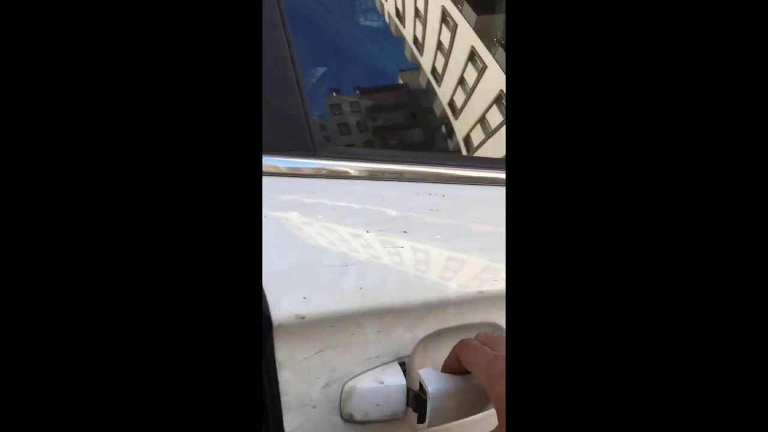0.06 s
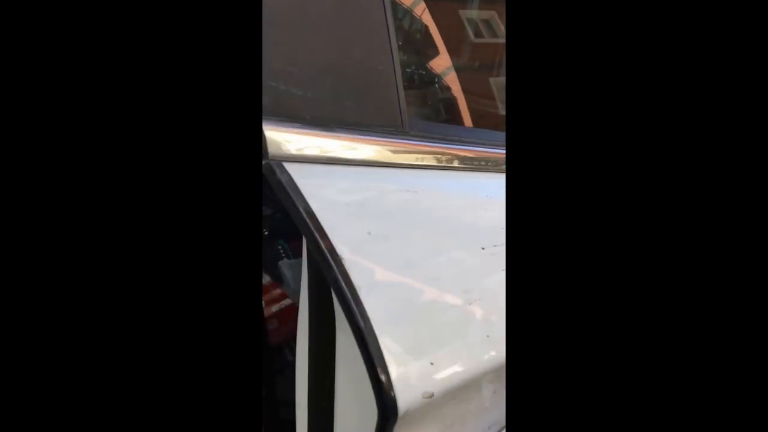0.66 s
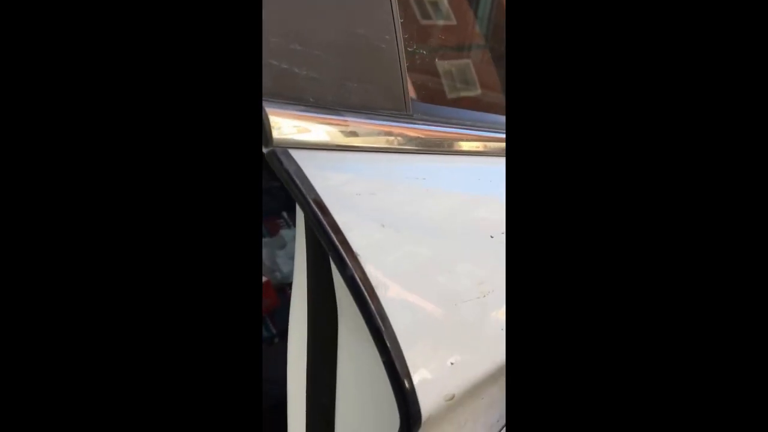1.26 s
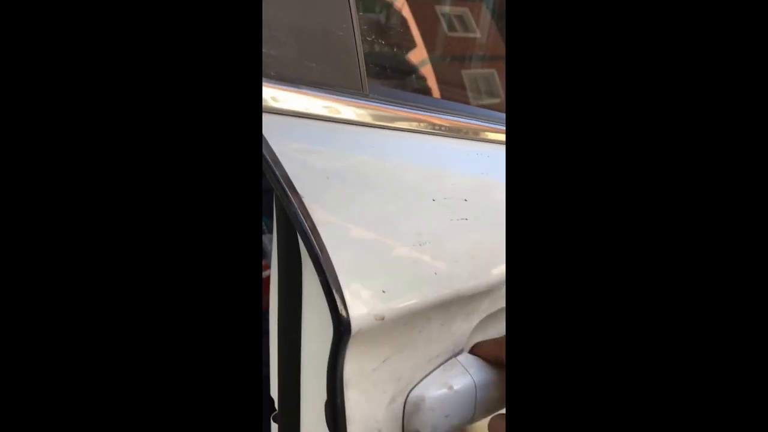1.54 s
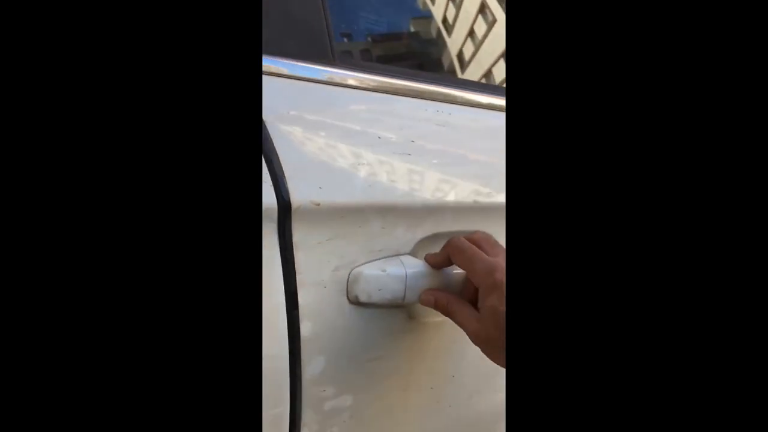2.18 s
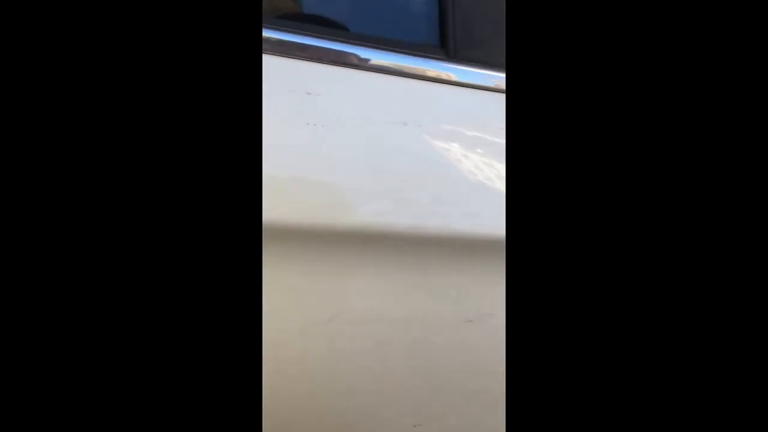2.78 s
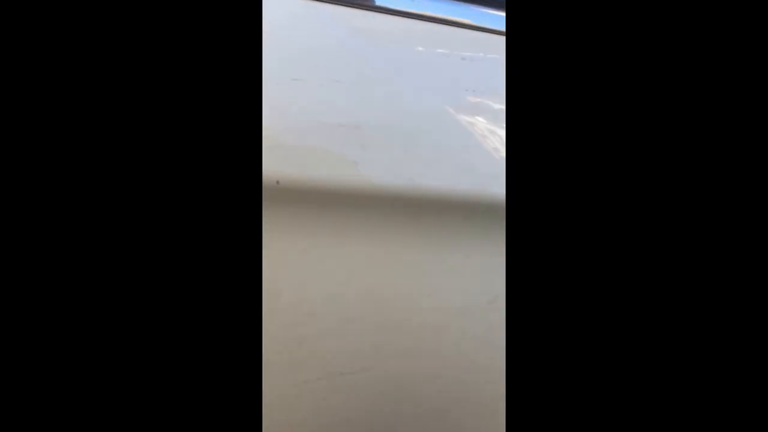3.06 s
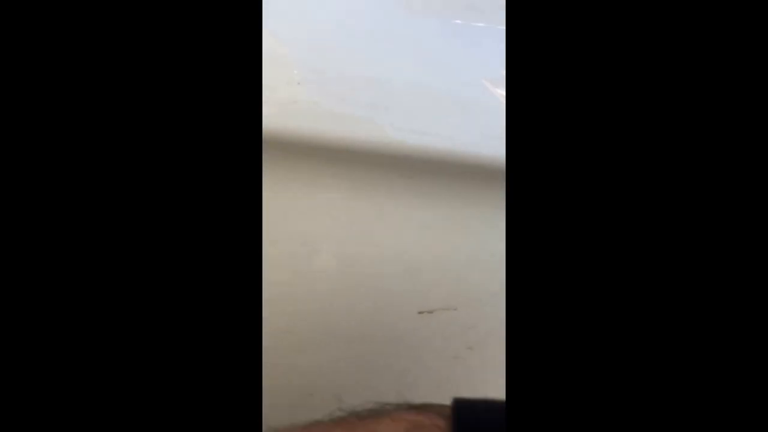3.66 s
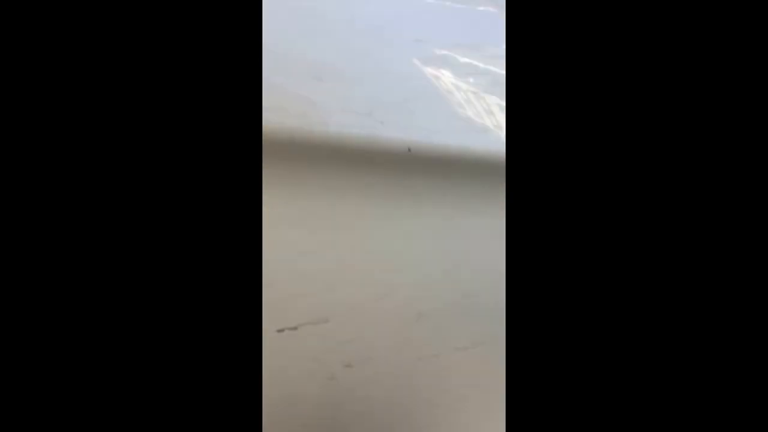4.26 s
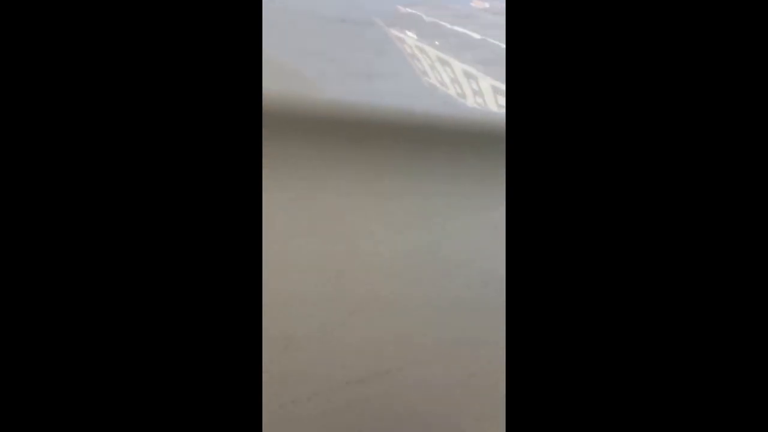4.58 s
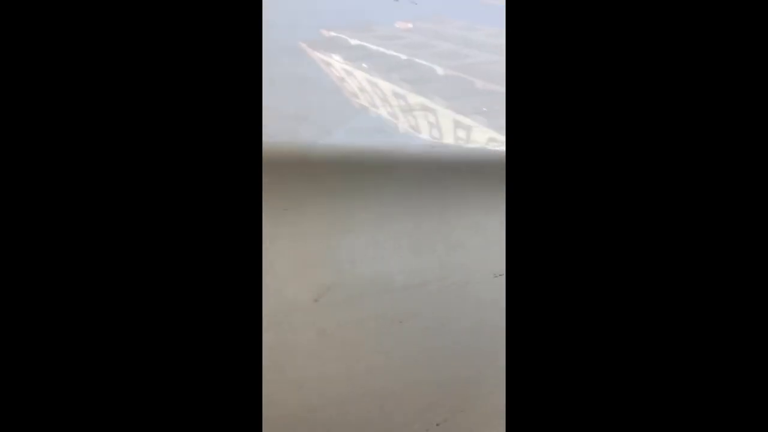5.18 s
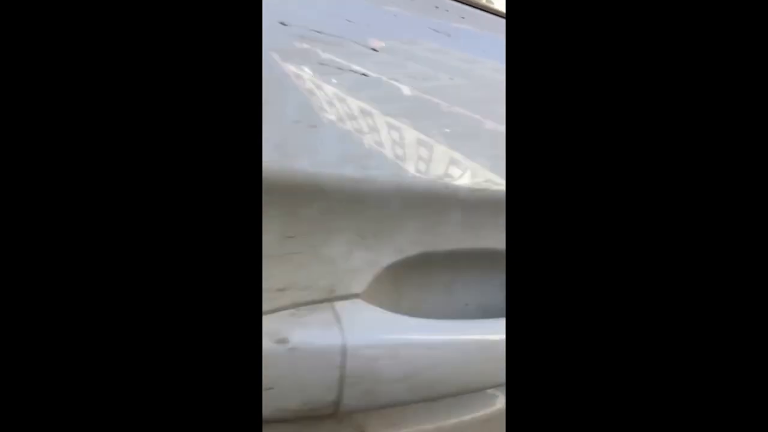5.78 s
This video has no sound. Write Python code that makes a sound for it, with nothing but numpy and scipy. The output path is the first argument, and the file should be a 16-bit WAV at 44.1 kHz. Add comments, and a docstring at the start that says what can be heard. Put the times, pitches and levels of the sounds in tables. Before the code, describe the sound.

On a city street with a faint rumble of traffic, a car door pops open close to the microphone. The plastic handle is pulled and released, clacking three times. The door then shuts with a metallic click and a short, low boom. Nine evenly spaced knuckle knocks follow on the door's metal skin, hollow and resonant, with a trace of echo from the buildings.

```python
"""A car door in a city street

Close by, the handle is pulled and the door pops open. A spring snaps the handle back three times.
The door is pushed shut: the latch clacks and the cabin booms. Then knuckles knock nine times on the
hollow sheet-metal panel, which rings with many tones at once. Behind it all, distant traffic rumbles,
a sleeve brushes past and the house fronts throw back a faint echo."""
import sys
import numpy as np
from scipy import signal
from scipy.fft import rfft, irfft, next_fast_len
from scipy.io import wavfile
from scipy.ndimage import uniform_filter1d, minimum_filter1d

SR = 44100
rng = np.random.default_rng(int(sys.argv[2]) if len(sys.argv) > 2 else 0)


def waveform_to_disk(signal):
    """Save audio, clipped to [-1, 1], as 16-bit WAV at the path in sys.argv[1]."""
    frames = np.transpose(np.atleast_2d(signal))
    scaled = np.clip(frames, -1, 1) * 32767
    samples = np.round(scaled).astype(np.int16)
    wavfile.write(sys.argv[1], SR, samples)


N = 266364
AGE = np.arange(SR * 3 // 4) / SR  # seconds since a short sound began

# Levels are relative. A ring time (t60) is the time to fade by 60 dB. More hardness means more treble.
# tone colour of distant traffic: (pitch [Hz], level [dB])
TRAFFIC_COLOUR = [(15, -35), (25, -18.5), (59, -2), (137, -7), (217, -16), (256, -14), (363, -15),
                  (405, -24), (439, -22.5), (476, -27), (624, -29), (734, -29.5), (1290, -33),
                  (5000, -54.5), (16000, -59)]
# traffic roar, turned down once the knocking starts, as by noise suppression: (time [s], level [dB])
ROAR_LEVELS = [(0, -49.5), (1.1, -48), (1.6, -50), (2.7, -51), (3.0, -47), (3.15, -53.5), (6.04, -51)]
# faint background hiss, turned down at times, as by noise suppression: (time [s], level [dB])
HISS_LEVELS = [(0, -63), (0.3, -76), (0.42, -62), (1.65, -66.5), (2.15, -79.5), (2.36, -67.5), (2.8, -68.5),
               (3.22, -82), (3.55, -68.5), (5.75, -68.5), (6.04, -71.5)]
# its colour: (pitch [Hz], level [dB])
HISS_COLOUR = [(2000, -15), (3500, -3), (6500, -2.5), (8000, -5), (9500, -5), (12000, -7), (16000, -10.5)]
# brushing cloth: (pitch [Hz], level [dB])
SLEEVE_COLOUR = [(1500, 2), (3400, -10), (4400, 0.5), (5200, -14), (7000, -15.5), (11000, -24),
                 (16000, -31)]
# how the echo fades: (pitch [Hz], ring time [s])
ECHO_DECAY = [(150, 0.99), (1000, 0.41), (4000, 0.12), (12000, 0.071)]

# the latch leaves or meets its catch: (time [s], level [dB], hardness [dB/octave])
LATCH_HITS = [(.1540, -15, -2), (2.2717, -10.5, -5), (2.2871, 0, 2.5), (2.292, -9.5, -7.5),
              (2.2974, -10, -6.5), (2.31, -25.5, 6), (2.325, -22, 0.5)]
# colour of those hits: (pitch [Hz], level [dB])
LATCH_COLOUR = [(50, -30.5), (150, -3.5), (400, -2), (600, 3.5), (900, 0.5), (1200, -3), (1600, -5.5),
                (2600, 0), (3500, -10.5), (5000, -18.5), (7000, -15.5), (10000, -27.5), (16000, -42.5)]
# tones of the steel latch: (pitch [Hz], level [dB], ring time [s])
LATCH_TONES = [(1167, 3.5, 0.11), (2200, -21, .07), (2540, 2, 0.065), (2690, -10, 0.036), (3040, 5, 0.048),
               (3310, -1, 0.056), (4200, -18, 0.092), (6570, -11, .05)]
# the whole door moves on its seal: (time [s], level [dB], hardness [dB/octave])
DOOR_THUMPS = [(0.1527, -6.5, 1.5), (0.171, -17, -3.5), (.719, -25, 0.5), (2.2959, 3.5, -4.5)]
# tones of door and cabin: (pitch [Hz], level [dB], ring time [s])
CABIN_TONES = [(45, -17.5, 0.36), (68.1, -2.5, 0.34), (97.56, -9.5, 0.48), (111, -11.5, 0.51),
               (147.7, -11, 0.29), (213.2, -13.5, .25), (247, -13, 0.34), (311, 0, 0.09), (374, -14, 0.14),
               (457, -9, 0.16)]

# the handle hits its stop:
# (time [s], level [dB], hardness [dB/octave], housing level [dB], flight time [s])
HANDLE_SNAPS = [(0.3777, 1, 3.5, -4, 0.028), (0.792, 1, 3.5, -2, .0305), (1.212, 2.5, 3, -2, .0333)]
# flying back, it slips off the fingers, then grazes its guide:
# (share of the flight left [0..1], level [dB], hardness [dB/octave])
FLIGHT_TICKS = [(0.98, -17.5, 0.5), (.31, -18.5, -2)]
# it bounces on the stop: (delay [s], level [dB], hardness [dB/octave])
HANDLE_BOUNCES = [(0, -3.5, 2), (.0044, -4.5, -5.5), (.012, -11, 0)]
# tones of the handle's housing: (pitch [Hz], level [dB])
HOUSING_TONES = [(102, -5), (165, -9), (221, 3), (262, 2.5), (292, 0), (350, -2.5), (420, -4.5), (480, -12),
                 (624, 4.5), (689, -4), (850, -6), (965, 0), (1380, -4.5), (1570, -3.5), (1965, -6.5)]
# clack of hard plastic: (pitch [Hz], level [dB])
SNAP_COLOUR = [(40, -43), (120, -21), (300, 5), (700, 13), (1300, 0.5), (2000, 3.5), (2600, -10), (3900, 0),
               (5200, -9.5), (6800, -7.5), (7900, -19.5), (9800, -16.5), (13000, -28.5), (16000, -30.5)]
# how plastic and latch metal fade: (pitch [Hz], ring time [s])
CLACK_DECAY = [(300, 0.082), (1500, 0.098), (5000, 0.059), (12000, 0.035)]
# tones of the handle's spring: (pitch [Hz], level [dB], ring time [s])
SPRING_TONES = [(2940, -7.5, .4), (3160, -3.5, 0.86), (3510, 1, 1), (3865, 0.5, .5)]
# clicks of the rods and plastic inside the handle: (time [s], level [dB], hardness [dB/octave])
ROD_TICKS = [(0.0878, -26.5, -2), (0.2448, -24.5, -6), (0.6247, -18, -3), (0.6887, -19.5, -1),
             (0.7192, -21.5, 2.5), (1.0514, -24.5, 0), (1.0959, -18, -1), (1.118, -25.5, 3.5),
             (1.4094, -31.5, 4), (1.6257, -27.5, 3)]
# their colour: (pitch [Hz], level [dB])
ROD_COLOUR = [(60, -49), (300, -15), (500, 4), (900, 3), (1800, 1), (2700, -6.5), (3900, -3.5), (6000, -16),
              (8000, -16), (9800, -17.5), (16000, -25)]
# the handle slides in its guide: (start [s], end [s], level [dB])
HANDLE_SLIDES = [(0.11, 0.238, -45.5), (0.608, 0.804, -48), (1.027, 1.222, -48.5), (1.728, 1.811, -54.5)]

# knuckle blows: (time [s], level [dB], hardness [dB/octave],
# spot [0 = stiff rim, 1 = middle of the panel], bone tap [dB], treble bite [dB])
KNUCKLE_BLOWS = [(3.0594, 0.5, -0.56, 0.3, -4, -1), (3.3411, 3, -0.76, .56, -1.5, 2),
                 (3.6103, 1.4, -1, 0.47, 2, 3), (3.8863, 1, -0.45, 0.78, 6, 1),
                 (4.18, 2, -0.7, 0.64, -4.5, -2.5), (4.4999, 0.1, -1.25, 0.68, 2, -1),
                 (4.8079, 1.55, -0.5, 0.26, 3, -0.5), (5.0936, -1.1, -0.6, 0.01, 2, -12.5),
                 (5.382, 0.5, -0.5, 0.013, 2, -2)]
# tones of the panel: (pitch [Hz], level hit at the rim [dB], in the middle [dB], uncapped ring time [s])
PANEL_TONES = [(107.7, -16.5, -16, 0.53), (133.05, -9, -7.5, 0.25), (147.2, -20.5, -17, 0.65),
               (170, -23.5, -8, 0.49), (185.1, -17.5, -13.5, 0.46), (207.3, -3, -10, 0.17),
               (232.9, -14.5, -24.5, 0.42), (271.4, -20, -14, 0.33), (294.9, -15.5, -14.5, 0.23),
               (328.7, -13, -20.5, 0.35), (351.6, -1.5, -16, 0.079), (371.7, -11, -12, 0.12),
               (401.3, -20, -5, 0.12), (456.7, -19, -10, 0.15), (502, -25.5, -35.5, 0.45),
               (535, -20.5, -19.5, 0.2), (573.6, -24, -32.5, 0.66), (598.6, -13.5, -22.5, 0.14),
               (639.5, -12, -14.5, 0.11), (679.6, -26.5, -14.5, 0.13), (726, -8.5, -15.5, 0.026),
               (790, -49.5, -29, 0.13), (754, -28, -34.5, 0.1), (815, -31.5, -24, 0.1),
               (922, -35, -36, 0.37), (938, -34, -22, 0.21), (979, -27, -22.5, 0.19), (957, -51, -27, 0.45),
               (1072, -16.5, -18, 0.078), (1148, -52, -43, 0.81)]
# its crowded upper tones, which blur into noise: (pitch [Hz], level [dB])
SHEET_COLOUR = [(60, -45.5), (200, -26), (450, -2), (700, 8), (1100, 1), (1600, -3), (2400, -6),
                (3200, -20.5), (4300, -33), (6000, -39), (9000, -37.5), (16000, -40.5)]
# how they fade: (pitch [Hz], ring time [s])
SHEET_DECAY = [(300, 0.27), (1100, 0.23), (1400, 0.15), (2500, 0.1), (4000, 0.12), (10000, 0.027)]
# the bone's first tap on the paint: (pitch [Hz], level [dB])
TAP_COLOUR = [(40, -53.5), (250, 6), (800, 5.5), (1700, 8.5), (2600, -8.5), (3500, -30.5), (5000, -52.5),
              (9000, -37.5), (16000, -50)]


def gain_of(db):
    """Turns decibels into a number to multiply by."""
    return 10 ** (np.asarray(db) / 20)


def evened(x):
    """Scales a signal to an average strength (rms) of 1."""
    return x / np.sqrt(np.mean(x ** 2) + 1e-20)


def fade(t60, t=AGE):
    """A fade that drops 60 dB every t60 seconds."""
    return np.exp(-np.log(1000) * t / t60)


def read(points, hz):
    """Looks up a table between its rows, on a musical (log) pitch scale."""
    pitches, values = np.transpose(points)
    return np.interp(np.log(hz + 1), np.log(pitches + 1), values)


def add(mix, s, sound):
    """Lays a sound into the mix at s seconds."""
    part = mix[round(s * SR):][:len(sound)]
    part += sound[:len(part)]


def noise(colour, size):
    """Noise of strength 1 with the given tone colour."""
    gains = gain_of(read(colour, np.fft.rfftfreq(size, 1 / SR)))
    return evened(irfft(rfft(rng.standard_normal(size)) * gains, size))


def filtered(x, curve_db):
    """Colours a short sound by a function from Hz to dB."""
    size = next_fast_len(2 * len(x))
    gains = gain_of(curve_db(np.fft.rfftfreq(size, 1 / SR)))
    return irfft(rfft(x, size) * gains, size)[:len(x)]


def tilted(x, hardness, pivot_hz):
    """A harder, shorter touch lifts the treble against the bass."""
    return filtered(x, lambda hz: hardness * np.log2(np.clip(hz / pivot_hz, 1 / 8, 8)))


def dying(x, decay):
    """Lets each pitch band of a steady sound fade at its own speed."""
    hz, spectrum = np.fft.rfftfreq(len(x), 1 / SR), rfft(x)
    centres, t60s = np.transpose(decay)
    bands = [irfft(spectrum * read(np.c_[centres, share], hz), len(x)) for share in np.eye(len(decay))]
    return sum(band * fade(t60) for band, t60 in zip(bands, t60s))


def ring(tones, travel, rise):
    """A struck part's fading tones; low ones travel slower (travel = delay in seconds at 1 kHz)."""
    hz, db, t60 = np.transpose(tones)[:, :, None]
    t = np.maximum(AGE - travel / np.sqrt(hz / 1000), 0)
    onset = 1 - np.exp(-(t / rise) ** 2)
    return (gain_of(db) * onset * fade(t60, t) * np.sin(2 * np.pi * hz * t)).sum(0)


def clack(colour, hardness, crack_db, crack_t60, tail_db):
    """Two hard parts meet: a sharp crack, then a short clatter."""
    grain = tilted(noise(colour, len(AGE)), hardness, pivot_hz=1930)
    contact_s = .0002 * 2 ** (-hardness / 2)  # a softer touch builds up more slowly
    onset = 1 - np.exp(-(AGE / contact_s) ** 2)
    crack = gain_of(crack_db) * grain * fade(crack_t60)
    return onset * (crack + gain_of(tail_db) * dying(grain, CLACK_DECAY))


def street():
    """Distant traffic and a faint background hiss; roar and hiss are turned down at set times."""
    t = np.arange(N) / SR
    traffic = signal.sosfilt(signal.butter(2, 4000, fs=SR, output="sos"), noise(TRAFFIC_COLOUR, N))
    rumble = signal.sosfiltfilt(signal.butter(2, 500, fs=SR, output="sos"), traffic)
    roar = gain_of(np.interp(t, *np.transpose(ROAR_LEVELS))) * evened(traffic - rumble)
    hiss = gain_of(np.interp(t, *np.transpose(HISS_LEVELS))) * noise(HISS_COLOUR, N)
    return gain_of(-40) * evened(rumble) + roar + hiss


def sleeve(start_s=2.79, rise_s=0.0068, fade_db_per_s=350, trail_s=.29):
    """Cloth brushes briefly and trails off in a soft hiss."""
    out = np.zeros(N)
    brush = np.minimum(AGE / rise_s, 1) * gain_of(-41 - fade_db_per_s * AGE)
    trail = gain_of(-61.5) * np.sin(np.pi * np.minimum(AGE / trail_s, 1))
    add(out, start_s, (brush + trail) * noise(SLEEVE_COLOUR, len(AGE)))
    return out


def echo(x):
    """Sound scatters back from the house fronts."""
    tail = dying(rng.standard_normal(len(AGE)), ECHO_DECAY) * (1 - np.exp(-AGE / 0.049))
    return signal.fftconvolve(x, tail / np.linalg.norm(tail))[:N]


def door(swell_cycles=0.27):
    """The door pops off its seal; later the latch catches and the cabin booms."""
    out = np.zeros(N)
    for s, db, hardness in LATCH_HITS:
        hit = clack(LATCH_COLOUR, hardness, crack_db=-31.5, crack_t60=0.043, tail_db=-12.5)
        add(out, s, gain_of(db) * hit)
    shut_s = LATCH_HITS[2][0]
    add(out, shut_s, gain_of(-20.5) * ring(LATCH_TONES, travel=0.00025, rise=0.00033))
    hz, tone_db, t60 = np.transpose(CABIN_TONES)
    for s, db, hardness in DOOR_THUMPS:
        tones = np.c_[hz, tone_db + hardness * np.log2(hz / 130), t60]
        boom = ring(tones, travel=0.0009, rise=swell_cycles / hz[:, None])
        add(out, s, gain_of(db - 8) * boom)
    return out


def tick(db, hardness):
    """One light click of the rods and plastic inside the handle."""
    return gain_of(db) * clack(ROD_COLOUR, hardness, crack_db=-6.5, crack_t60=.016, tail_db=-27)


def spring(flutter_db=4, flutter_s=.012):
    """The handle's spring sits loosely, so its ring flutters."""
    shake = evened(uniform_filter1d(rng.standard_normal(len(AGE)), size=round(flutter_s * SR)))
    return gain_of(-54 + flutter_db * shake) * ring(SPRING_TONES, travel=0, rise=0.00082)


def slides(ticks_per_s=28, tick_lift_db=18.5, spread_db=2.5):
    """The handle rubs unevenly along its guide, with faint random ticks."""
    out = np.zeros(N)
    for start, end, db in HANDLE_SLIDES:
        size = round((end - start) * SR)
        grip = gain_of(2 * evened(uniform_filter1d(rng.standard_normal(size), size=200)))
        rub = tilted(noise(ROD_COLOUR, size), hardness=0.46, pivot_hz=2000)
        add(out, start, gain_of(db) * evened(rub * grip) * signal.windows.tukey(size, .4))
        for place, strength in rng.random((round(ticks_per_s * (end - start)), 2)):
            tick_db = db + tick_lift_db + spread_db * (2 * strength - 1)
            add(out, start + place * (end - start), tick(tick_db, hardness=0.8))
    return out


def handle(lowest_hz=85):
    """The handle slides out, its rods tick, and the spring throws it back against the housing."""
    out = np.zeros(N)
    hz, tone_db = np.transpose(HOUSING_TONES)
    t60 = 0.16 / np.sqrt(hz / 100)
    housing = ring(np.c_[hz, tone_db, t60], travel=.0012, rise=0.0011)
    for s, db, hardness, housing_db, flight_s in HANDLE_SNAPS:
        for to_go, tick_db, tick_hardness in FLIGHT_TICKS:
            add(out, s - to_go * flight_s, tick(db + tick_db, tick_hardness))
        add(out, s, gain_of(housing_db - 8) * housing)
        for delay, bounce_db, harder in HANDLE_BOUNCES:
            hit = clack(SNAP_COLOUR, hardness + harder, crack_db=-1.5, crack_t60=0.0055, tail_db=-14.5)
            add(out, s + delay, gain_of(db + bounce_db) * hit)
    add(out, HANDLE_SNAPS[0][0], spring())  # rings on the first snap only
    for s, db, hardness in ROD_TICKS:
        add(out, s, tick(db, hardness))
    out += slides()
    # so small a part gives off no deep bass
    return signal.sosfilt(signal.butter(3, lowest_hz, "highpass", fs=SR, output="sos"), out)


def bone_tap(size=2048):
    """Bone meets paint: the shortest pulse that has the tap's colour, with a peak of 1."""
    log_gain = np.log(gain_of(read(TAP_COLOUR, abs(np.fft.fftfreq(size, 1 / SR)))))
    spectrum = np.exp(np.conj(signal.hilbert(log_gain)))  # packs the energy at the very start
    pulse = np.fft.ifft(spectrum).real[:size // 2]
    return np.pad(pulse / abs(pulse).max(), (0, len(AGE) - len(pulse)))


def knuckle_bite(x, bite_db, centre_hz=3300, octaves=.55):
    """A bony knuckle brings out one treble band; a fleshy one mutes it."""
    return filtered(x, lambda hz: bite_db * np.exp(-(np.log2((hz + 1) / centre_hz) / octaves) ** 2))


def knocks(longest_ring_s=0.36, swell_cycles=0.8, detune=0.01):
    """Each blow rings the same panel; the spot struck sets how strong each tone is."""
    out = np.zeros(N)
    hz, rim_db, middle_db, t60 = np.transpose(PANEL_TONES)
    t60 = np.minimum(t60, longest_ring_s)
    places = np.linspace(0, 1, num=4)  # the crowded tones answer differently along the panel
    patterns = np.array([noise(SHEET_COLOUR, len(AGE)) for _ in places])
    for s, db, hardness, spot, tap_db, bite_db in KNUCKLE_BLOWS:
        # short waves have their still points close together, so they vary most from blow to blow
        scatter_db = 4 * np.minimum(hz / 800, 1) * rng.uniform(-1.5, 1.2, len(hz))
        tone_db = rim_db + spot * (middle_db - rim_db) + hardness * np.log2(hz / 400) + scatter_db
        # the hand presses on the panel a little differently each time
        shifted_hz = hz * (1 + detune * rng.standard_normal(len(hz)))
        body = ring(np.c_[shifted_hz, tone_db, t60], travel=.0012, rise=swell_cycles / hz[:, None])
        nearness = np.exp(-((spot - places) / 0.25) ** 2)
        sheet = dying(evened(nearness @ patterns), SHEET_DECAY) * (1 - np.exp(-AGE / 0.0014))
        upper = gain_of(-17.5) * sheet + gain_of(tap_db - 10) * bone_tap()
        upper = tilted(upper, hardness + 0.48 * (spot - .5), pivot_hz=500)
        add(out, s, gain_of(db) * (body + knuckle_bite(upper, bite_db)))
    return out


def scene():
    """The door close by, its echo, the street and the sleeve, in one channel."""
    near = knocks() + handle() + door()
    return (near + gain_of(-38) * echo(near) + street() + sleeve())[None]


def record(dry, lowest_hz=32, highest_hz=16400):
    """The microphone drops the deepest bass, a fast limiter holds the peaks, the top treble is cut."""
    heard = signal.sosfilt(signal.butter(3, lowest_hz, "highpass", fs=SR, output="sos"), dry)
    allowed = np.minimum(1, 1 / (abs(heard) + 1e-9))  # the gain that keeps each sample within full scale
    held = minimum_filter1d(allowed, size=61)
    smooth_gain = uniform_filter1d(uniform_filter1d(held, size=31), size=31)
    treble_cut = signal.firwin(511, highest_hz, window=("kaiser", 9), fs=SR)
    return signal.oaconvolve(heard * smooth_gain, treble_cut[None], "same")


dry = scene()
out = record(dry)
waveform_to_disk(out)
```